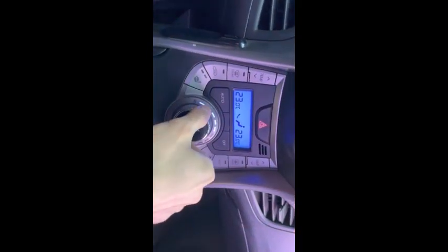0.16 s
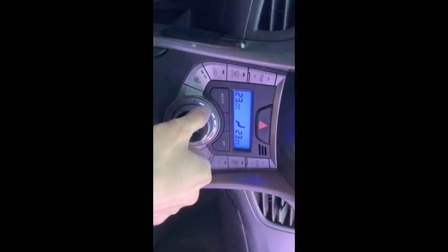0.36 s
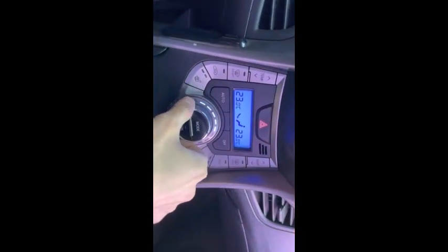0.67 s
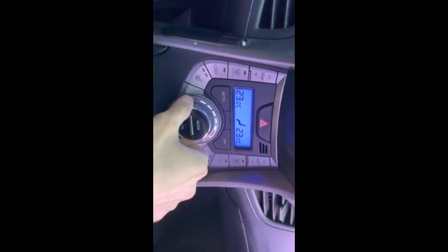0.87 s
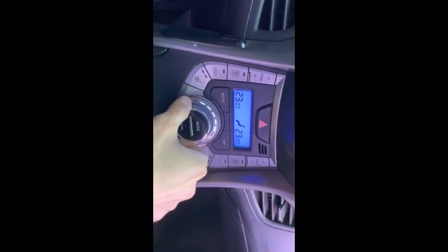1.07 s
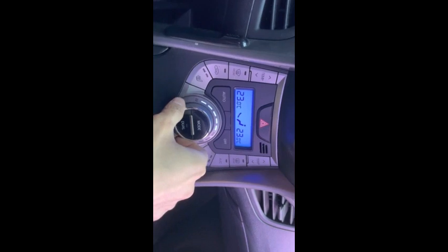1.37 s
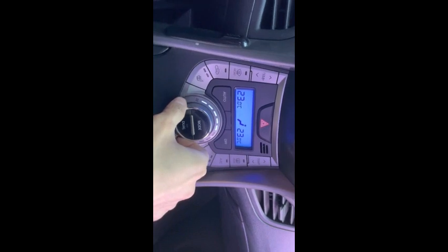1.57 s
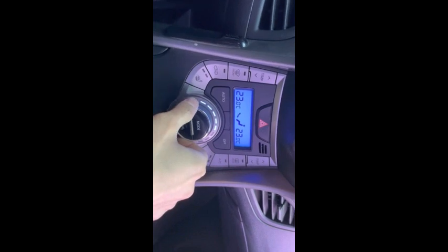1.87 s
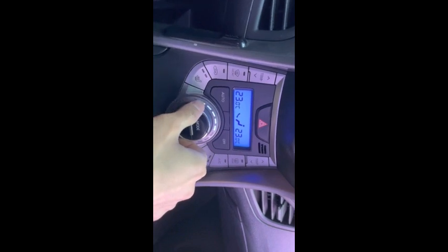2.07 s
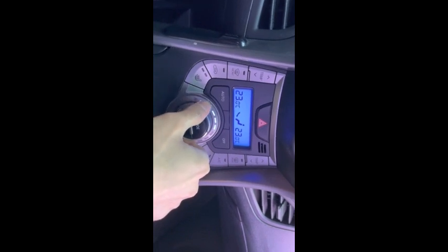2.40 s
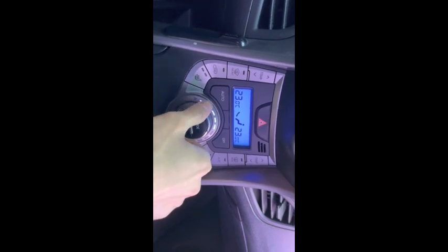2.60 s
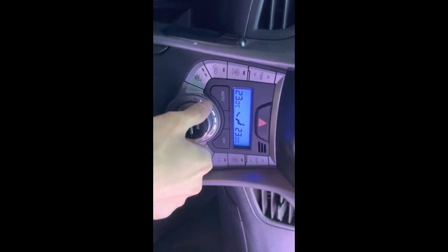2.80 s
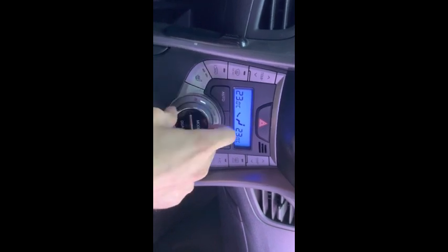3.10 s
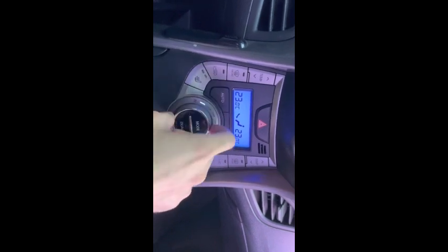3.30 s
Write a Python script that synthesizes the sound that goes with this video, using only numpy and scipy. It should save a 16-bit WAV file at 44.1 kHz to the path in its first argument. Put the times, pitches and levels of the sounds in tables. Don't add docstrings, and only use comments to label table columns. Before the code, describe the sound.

Rapid small dial clicks open, blower air rises to a steady hiss buffeting the nearby microphone, then a denser, sharper click burst cuts the airflow; a low engine idle hums throughout the small cabin.

```python
import sys
import numpy as np
from scipy import signal
from scipy.fft import rfft, irfft
from scipy.io import wavfile
from scipy.ndimage import uniform_filter1d

SR = 44100
rng = np.random.default_rng(int(sys.argv[2]) if len(sys.argv) > 2 else 0)


def digitize_waveform(pressure):
    field = np.atleast_2d(pressure).T
    bounded = np.clip(field, -1, 1)
    quanta = np.round(bounded * 32767).astype(np.int16)
    wavfile.write(sys.argv[1], SR, quanta)


def level_to_linear(level):
    exponent = np.asarray(level, float) / 20
    return 10 ** exponent


N = 152145

# pitch_hz, density_db (per Hz)
CABIN = [(76, -31.5), (130, -12.5), (183, -5), (329, -7), (444, -5), (674, -17.5), (843, -23.5),
         (1200, -29.5), (1560, -48), (2640, -120)]
# pitch_hz, wander_width_hz, level_db
HUM = [(31.4, 5.5, -55.5), (36.7, 12, -56.5), (63.54, 11.62, -41), (254.4, 6, -62.5), (290, 4.95, -54.5),
       (367, 8.72, -59.5), (460.3, 12.1, -65), (509, 7.1, -75)]
CABIN_DB, CABIN_FOLLOW = -48.5, 0.064

# time_s, level_db
FLOW = [
    (0.0, -62.5),
    (0.1, -61),
    (0.7, -54),
    (1.33, -55),
    (1.81, -56.5),
    (3.06, -57.5),
    (3.2, -64.5),
    (3.45, -68.5),
]
# pitch_hz, density_db (per Hz)
RUSH = [(290, -30.5), (500, 2), (773, -6), (862, -5.5), (1300, -9.5), (1520, -8.5), (2410, -19),
        (3910, -22.5), (9000, -41.5), (11700, -88.5), (19800, -120)]
# pitch_hz, width_hz, lift_db
DUCTS = [(856, 73, 9), (1005, 47, 6), (1214, 37, 6.5), (1539, 68, 5), (1750, 45, -3.5), (1880, 38, 3.5),
         (2000, 160, 1.5), (2245, 90, 3.5), (2830, 110, -4), (3430, 100, 3), (3940, 36, 8), (4120, 150, -3),
         (4930, 140, -3)]
RUSH_DB, RUSH_PATCH_DB, RUSH_FLICKER_DB, RIPPLE_DB = 0.5, 1, 0.84, 1.5
BRIGHTEN = 0.14

# time_s, level_db
BUFFET = [(0, -44), (.3, -39.5), (.5, -34), (.62, -26), (.72, -25), (.9, -30.5), (1.13, -33), (1.2, -32.5),
          (1.6, -31), (1.69, -35.5), (1.74, -33), (2.1, -31), (2.5, -34), (2.9, -31), (2.96, -29),
          (3.1, -31), (3.22, -42.5), (3.45, -39)]
# pitch_hz, density_db (per Hz)
THUMP = [(11, -52.5), (18, -21), (27, -24), (50, -5.5), (70, 2), (109, -3), (166, -20), (260, -23.5),
         (340, -56), (570, -120)]
# start_s, level_db, pitch_hz, length_s
GUSTS = [
    (0.531, -13.5, 66.3, 0.048),
    (0.62, -11.5, 69.3, 0.055),
    (0.74, -17.5, 66.6, 0.02),
    (0.956, -19, 83, 0.04),
    (0.41, -26.5, 47, 0.066),
    (1, -21, 85.5, .05),
    (0.833, -26.5, 83.7, .03),
    (2.343, -23, 72.4, 0.13),
    (2.621, -24.5, 86, 0.038),
]
# start_s, level_db, pitch_hz
EDDIES = [(0.567, -27, 290), (0.62, -25, 194), (0.644, -28.5, 268), (0.736, -30, 161), (0.839, -34.5, 156),
          (.965, -29.5, 165), (1.188, -30.5, 152), (1.718, -32.5, 166), (2.549, -27.5, 165),
          (.53, -26.5, 150), (3.097, -38.5, 295)]
LUMP_DB, LUMPS_PER_S = 0.5, 51
EDDY_CYCLES, GUST_EDGE = 3.03, 0.2

# start_s, length_s, level_db
SCRAPES = [
    (0.015, 0.034, -50),
    (0.06, 0.032, -52),
    (0.105, 0.073, -63),
    (2.981, 0.087, -42.5),
    (3.075, .012, -49.5),
    (3.084, 0.059, -41),
    (0.175, 0.1, -71.5),
    (3.205, .09, -60),
    (3.288, 0.26, -73),
    (3.41, 0.019, -59),
]
# pitch_hz, density_db (per Hz)
GRIT = [(250, -40), (450, 10), (900, -6), (1900, -6), (2500, -16.5), (6300, -17.5), (9000, -31),
        (13500, -59), (14800, -33), (16000, -33.5)]
# pitch_hz, width_hz, lift_db
PANEL = [(450, 30, 3.5), (620, 46, 11), (925, 70, 13), (1250, 110, 5), (1610, 230, 8.5), (3200, 270, 3.5)]
GRIT_PER_S, CATCH_DB = 7900, 2.0

# start_s, peak_db, knock_db (relative), knock_pitch_hz, favoured_ring_hz
CLICKS_UP = [(.0014, -46, -10.5, 1500, 5345), (0.0319, -40.5, 1.5, 1275, 5300),
             (0.0388, -37.5, 4, 1700, 3240), (0.059, -56, 5, 1630, 2000), (0.0731, -55, 11, 1220, 2000),
             (.1149, -39.5, -0.5, 1250, 5400), (.126, -44, 1.5, 1400, 3200), (.1305, -60, 17.5, 670, 2000),
             (0.148, -51, 4, 1900, 4790), (0.168, -42.5, 6.5, 1500, 5600), (0.174, -33.5, -0.5, 1490, 5400),
             (0.178, -53, 15, 896, 2000), (0.2105, -60, 12, 1200, 2000), (0.245, -41, 5.5, 1690, 5430),
             (0.265, -57, 6, 2000, 5400), (0.2986, -48.5, 14, 1600, 2420), (0.299, -57, 23.5, 730, 2420)]
# start_s, peak_db, knock_db (relative), knock_pitch_hz, favoured_ring_hz
CLICKS_DOWN = [(2.9823, -38, -1, 1310, 3200), (2.9893, -32, -3.5, 1750, 6300), (3.003, -39, -3, 1520, 3200),
               (3.0111, -38.5, 5.5, 1500, 2280), (3.0145, -48, 14, 640, 2000),
               (3.0204, -41.5, 2.5, 910, 3940), (3.0276, -40, -11, 1210, 4400),
               (3.0338, -31, -3, 1350, 4000), (3.0463, -39, -8, 940, 5400), (3.0538, -40, -4, 1650, 3240),
               (3.061, -53.5, 19, 450, 2000), (3.0673, -40.5, 6, 1510, 4000),
               (3.0737, -34.5, 1, 1160, 3140), (3.0905, -28.5, -7, 1520, 6370),
               (3.094, -40, 10.5, 925, 3130), (3.101, -35.5, -4.5, 1200, 5750),
               (3.106, -34.5, -2, 1250, 3240), (3.114, -41.5, 4, 910, 4400), (3.12, -39.5, -3, 1290, 3240),
               (3.1318, -42.5, -12, 1490, 5400), (3.1396, -40.5, -2.5, 1400, 3220),
               (3.1746, -31.5, -6, 1320, 5400), (3.2674, -30, -5.5, 1600, 5400),
               (3.4138, -49.5, 0, 1480, 5400), (3.447, -44.5, -8, 1480, 5400)]
# pitch_hz, level_db, t60_s
RING = [(2000, -6, 0.012), (2290, -5, 0.023), (3130, -18, 0.012), (3240, 1, 0.013), (4090, -1.5, 0.013),
        (4510, -0.5, 0.015), (4790, -3, 0.011), (5400, 3, 0.0076), (5820, 2.5, 0.0069), (6370, -9, 0.007),
        (6680, 1.5, 0.008), (8150, -11, 0.015), (7500, -2.5, 0.006), (8860, -18, 0.0069)]
# pitch_hz, density_db (per Hz)
THUD = [(500, -23), (900, 8.5), (2400, -2), (3400, -10), (5000, -31)]
# pitch_hz, density_db (per Hz)
SNAP = [(1000, -12), (3000, 0.5), (6300, 0), (10000, -5), (12500, -17), (15500, -17)]
# pitch_hz, density_db (per Hz)
TAIL = [(400, -1), (900, -5), (1900, 0), (2600, -16), (6300, -17), (9000, -30), (13500, -57), (15000, -35),
        (16000, -35.5)]
SPREAD_DB, DETUNE = 1.5, 0.008
FAVOUR_DB, FAVOUR_OCT = 8, 0.12
RING_RISE_S, REBOUND_S, RISE_S = 0.0003, 0.0007, 0.0014
KNOCK_DB, KNOCK_CYCLES, KNOCK_SWELL_S = 4.5, 35.3, 0.003
THUD_DB, THUD_T60 = 1, 0.012
CRACK_DB, CRACK_T60, CRACK_GROWTH = -8, 0.0055, 1.3
TAIL_DB, TAIL_T60 = -8.5, 0.044

# pitch_hz, width_hz, lift_db
PORT = [(5600, 700, 3), (12100, 5400, -6.5), (15500, 1200, 14)]
# pitch_hz, density_db (per Hz)
HISS = [(6000, -5.5), (9000, -15.5), (13500, -14), (14600, 5.5), (15400, 9.5), (15900, -4)]
HISS_DB, LIMIT, EDGE_HZ = -92.5, 0.4, 16050


def evened(x):
    return x / np.sqrt(np.mean(x ** 2) + 1e-20)


def read(points, hz):
    f, value = np.transpose(points)
    u, edge = np.log2(hz + 1), np.log2(f + 1)
    outside = np.maximum(edge[0] - u, 0) + np.maximum(u - edge[-1], 0)
    return np.interp(u, edge, value) - 9 * outside


def curve(points, t):
    return np.interp(t, *np.transpose(points))


def colour(x, points):
    gain = level_to_linear(read(points, np.fft.rfftfreq(len(x), 1 / SR)))
    return evened(irfft(rfft(x) * gain, len(x)))


def resonances(table, hz):
    return sum(db / (1 + (2 * (hz - f) / width) ** 2) for f, width, db in table)


def drift(per_s):
    return evened(signal.lfilter(*signal.butter(2, per_s, fs=SR), rng.standard_normal(N)))


def ease_in(t, rise_s):
    return np.sin(np.pi / 2 * np.minimum(t / rise_s, 1)) ** 2


def add(mix, s, sound):
    part = mix[max(round(s * SR), 0):][:len(sound)]
    part += sound[:len(part)]


def cabin():
    t = np.arange(N) / SR
    flow = curve(FLOW, t)
    out = level_to_linear(CABIN_DB) * colour(rng.standard_normal(N), CABIN)
    for hz, width, db in HUM:
        level = level_to_linear(db + 3.7 * drift(5.3)) * np.sqrt(2)
        phase = 2 * np.pi * np.cumsum(hz + width / 2 * drift(6.28)) / SR
        out = out + level * np.sin(phase)
    return out * level_to_linear(CABIN_FOLLOW * (flow - flow.max()))


def rush():
    frames, hz = N // 256 + 5, np.fft.rfftfreq(1024, 1 / SR)
    a, b, patches = rng.standard_normal((frames, 513, 3)).T
    patches = uniform_filter1d(patches, size=10, axis=0)
    patches = evened(uniform_filter1d(patches, size=8, axis=1))
    shape = read(RUSH, hz)
    middle = (hz > 1000) & (hz < 5000)
    shape = shape - 10 * np.log10(np.sum(level_to_linear(2 * shape)[middle]))
    flow = curve(FLOW, np.arange(frames) * 256 / SR)
    tilt = BRIGHTEN * np.log2(hz / 2000 + 0.31)[:, None] * (flow - flow.max())
    flicker = RUSH_FLICKER_DB * rng.standard_normal(frames)
    field = shape[:, None] + flow + tilt + RUSH_PATCH_DB * patches + flicker
    air = signal.istft((a + 1j * b) * level_to_linear(field), nperseg=1024, noverlap=768)[1][:N]
    fine = np.fft.rfftfreq(N, 1 / SR)
    ripple = RIPPLE_DB * evened(uniform_filter1d(rng.standard_normal(len(fine)), size=120))
    return irfft(rfft(air) * level_to_linear(RUSH_DB + ripple + resonances(DUCTS, fine)), N)


def buffet():
    level = curve(BUFFET, np.arange(N) / SR) + LUMP_DB * drift(LUMPS_PER_S)
    out = colour(rng.standard_normal(N), THUMP) * level_to_linear(level)
    eddies = [(s, db, hz, EDDY_CYCLES / hz) for s, db, hz in EDDIES]
    for s, db, hz, length in list(GUSTS) + eddies:
        t = np.arange(0, length, 1 / SR)
        swing = np.sin(2 * np.pi * hz * t) + GUST_EDGE * np.cos(4 * np.pi * hz * t)
        add(out, s, level_to_linear(db) * np.sin(np.pi * t / length) * swing)
    return out


def scrape():
    t, hz = np.arange(N) / SR, np.fft.rfftfreq(N, 1 / SR)
    grit = (rng.random(N) < GRIT_PER_S / SR) * rng.standard_normal(N)
    grit = irfft(rfft(grit) * level_to_linear(resonances(PANEL, hz)), N)
    grit = colour(grit, GRIT) * level_to_linear(CATCH_DB * drift(40))
    strokes = np.zeros(N)
    for s, length, db in SCRAPES:
        strokes += level_to_linear(db) * np.clip(np.minimum(t - s, s + length - t) / 0.0037, 0, 1)
    return grit * strokes


def ring(t, draws, favour_hz):
    out = np.zeros(len(t))
    for (hz, db, t60), (a, b) in zip(RING, draws):
        favour = FAVOUR_DB * np.exp(-(np.log2(hz / favour_hz) / FAVOUR_OCT) ** 2)
        level = level_to_linear(db + SPREAD_DB * a + favour - 60 * t / t60)
        out += level * np.sin(2 * np.pi * hz * (1 + DETUNE * b) * t)
    return out / np.sqrt(len(RING))


def knock(t, db, hz, noise):
    t60 = KNOCK_CYCLES / 1000 / (max(hz, 850) / 1000) ** 2
    tone = level_to_linear(db + KNOCK_DB - 60 * t / t60) * np.sin(2 * np.pi * hz * t)
    thud = level_to_linear(db + THUD_DB - 60 * t / THUD_T60) * colour(noise, THUD)
    return tone * np.minimum(t / KNOCK_SWELL_S, 1) + thud


def dial():
    out, t = np.zeros(N), np.arange(3000) / SR
    for s, db, knock_db, knock_hz, favour_hz in list(CLICKS_UP) + list(CLICKS_DOWN):
        draws, noise = rng.standard_normal((14, 2)), rng.standard_normal((3, len(t)))
        body = ring(t, draws, favour_hz) * (1 - np.exp(-(t / RING_RISE_S) ** 2))
        rebound_s = REBOUND_S * (1 + 0.22 * abs(draws[0, 1]))
        add(body, rebound_s, 0.41 * body.copy())
        hollow = knock(t, knock_db, knock_hz, noise[2])
        crack_db = CRACK_DB + CRACK_GROWTH * (db + 34.5)
        crack = level_to_linear(crack_db - 60 * t / CRACK_T60) * colour(noise[0], SNAP)
        tail = level_to_linear(TAIL_DB - 60 * t / TAIL_T60) * colour(noise[1], TAIL) * ease_in(t, 0.0014)
        add(out, s, level_to_linear(db) * ((body + hollow + crack) * ease_in(t, RISE_S) + tail))
    return out


def scene():
    return (cabin() + rush() + buffet() + scrape() + dial())[None]


def band_limit(x):
    return signal.sosfilt(signal.butter(12, 17040, fs=SR, output="sos"), x)


def record(dry):
    hz = np.fft.rfftfreq(N, 1 / SR)
    heard = rfft(LIMIT * np.tanh(dry / LIMIT)) * level_to_linear(resonances(PORT, hz))
    hiss = rfft(level_to_linear(HISS_DB) * colour(rng.standard_normal(N), HISS))
    mix = irfft((heard + hiss) * (hz < EDGE_HZ), N)
    return band_limit(mix)


dry = scene()
out = record(dry)
digitize_waveform(out)
```